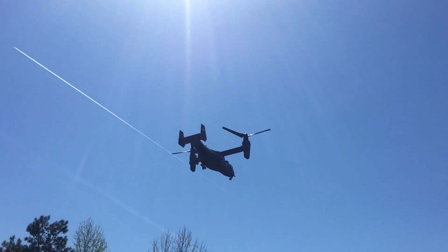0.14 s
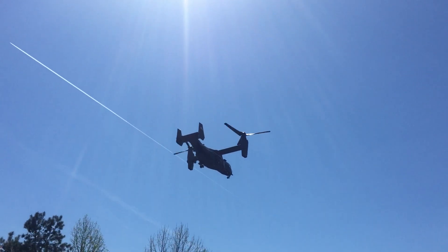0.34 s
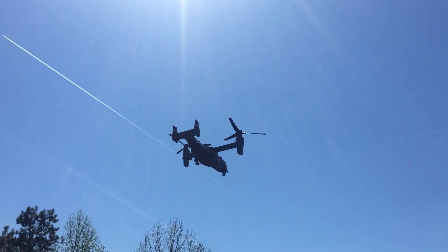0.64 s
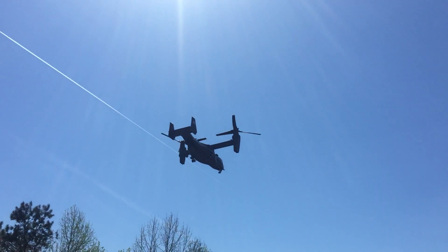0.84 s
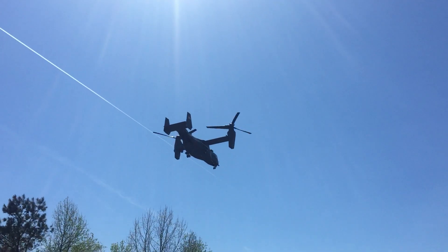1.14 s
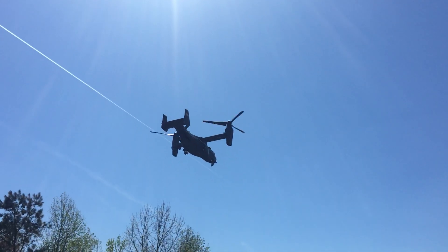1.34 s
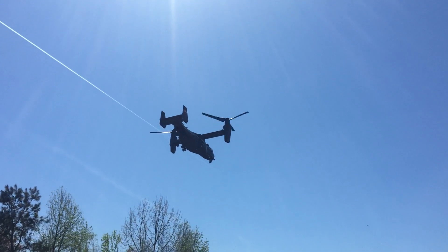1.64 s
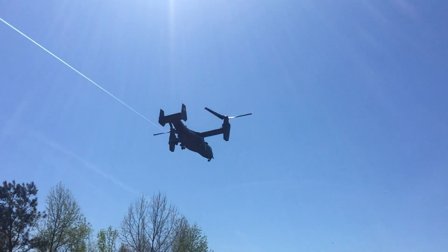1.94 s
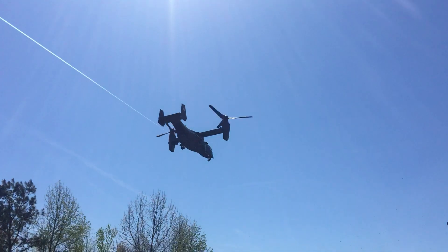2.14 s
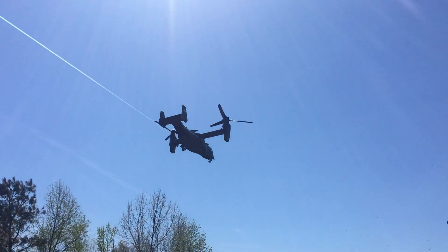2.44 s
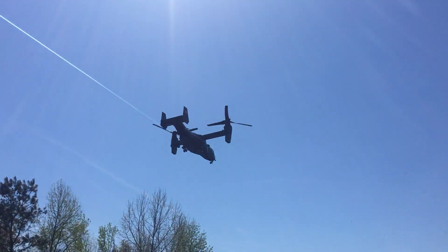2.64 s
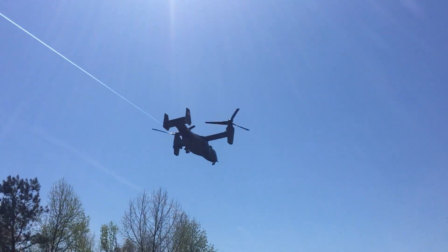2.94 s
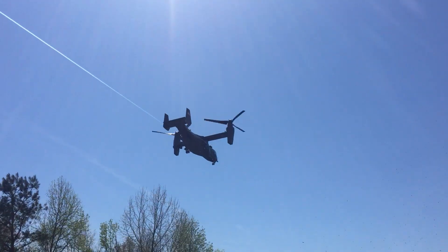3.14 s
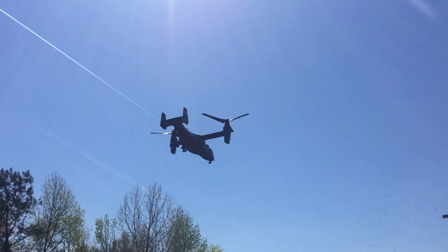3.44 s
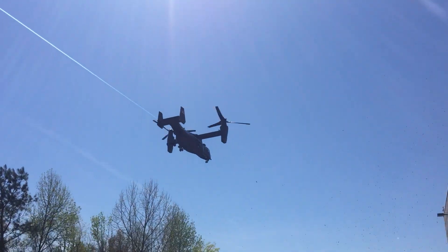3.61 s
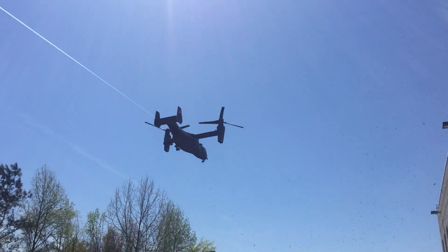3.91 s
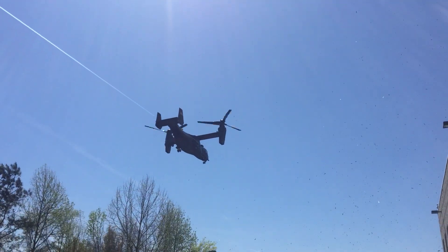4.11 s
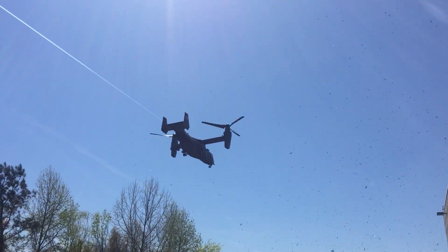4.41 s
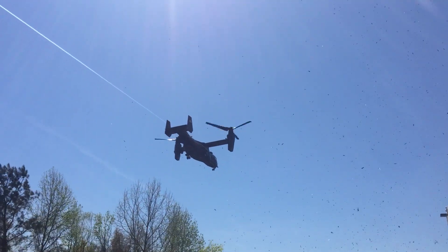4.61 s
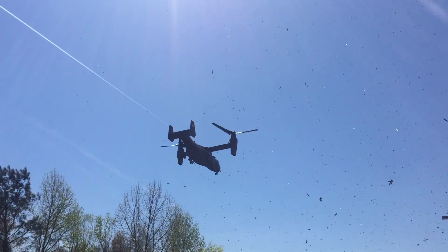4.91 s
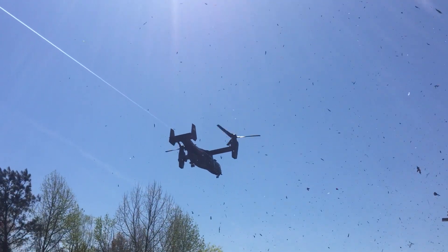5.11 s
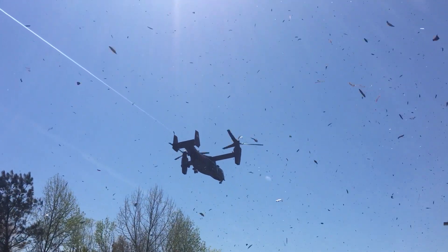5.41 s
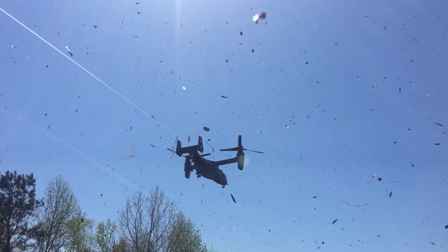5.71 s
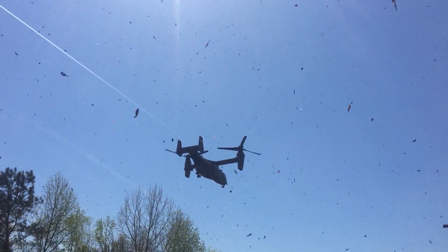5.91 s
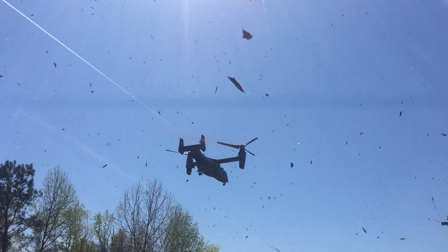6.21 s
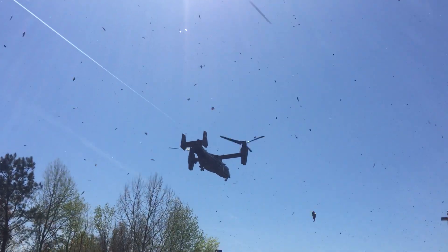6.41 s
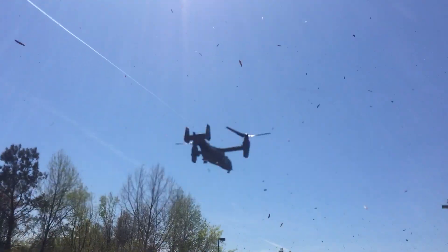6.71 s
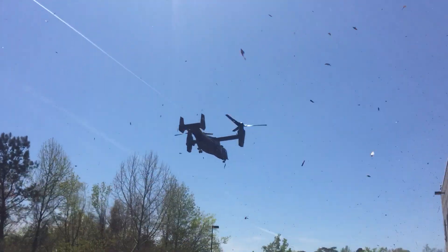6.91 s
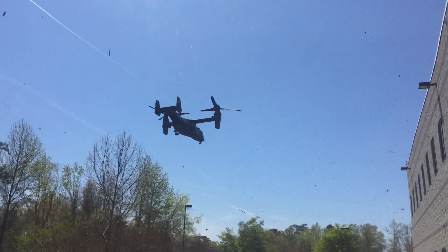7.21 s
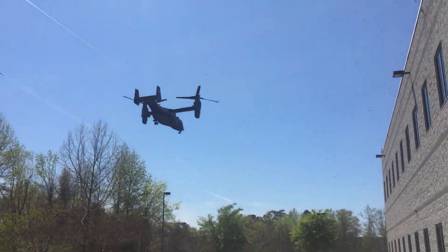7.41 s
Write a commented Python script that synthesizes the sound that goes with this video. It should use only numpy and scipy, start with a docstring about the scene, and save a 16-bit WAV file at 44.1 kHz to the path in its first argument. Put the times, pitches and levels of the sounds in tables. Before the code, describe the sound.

A tiltrotor aircraft passes low overhead with loud thudding blades and roaring engines, then its downwash blasts wind and grit against the microphone.

```python
"""A tiltrotor aircraft passes low overhead on its way down to land, heard from beside a building.
On approach, each blade of its two rotors slaps (a thump plus tip-vortex cracks), heard directly and
off the ground and walls, over a pulsing swish and the engines' roar. Near 4.2 s it is overhead and its
hum sits higher. From about 5 s the downwash buffets the microphone; from 6.5 s it throws grit at it.
The loudest peaks overload and are ducked by a limiter."""
import sys
import numpy as np
from scipy import signal
from scipy.fft import rfft, irfft, next_fast_len
from scipy.io import wavfile
from scipy.ndimage import uniform_filter1d, minimum_filter1d, map_coordinates

SR = 44100
rng = np.random.default_rng(int(sys.argv[2]) if len(sys.argv) > 2 else 0)


def int16_out(signal):
    """Quantize to a 16-bit WAV file."""
    q = np.round(np.clip(np.atleast_2d(signal).T, -1, 1) * 32767)
    wavfile.write(sys.argv[1], SR, q.astype(np.int16))


N = 332955
TIME = np.arange(N) / SR
BLADE_HZ, OVERHEAD_S = 20.53, 4.19

# aircraft nears, then recedes: (time [s], extra travel time [ms])
PATH_DELAY = [(0, 2.8), (.45, .5), (.85, .2), (1.45, -1.5), (2.2, -.8), (3.2, .4), (3.8, .7), (4.55, .25),
              (5.55, 5.1), (6.65, 7.6), (7.55, 11.05)]
# ground echo, closing in on descent: (time [s], lag [ms], echo level of near thump [dB])
GROUND_ECHO = [(0, 4.28, 0), (1.4, 4.15, 0), (3.1, 4.06, -3), (3.8, 3.74, -2.8), (4.8, 3.73, -10),
               (6, 3.2, -1.4), (7.55, 3.46, -2.1)]
# each rotor beams its thump at the listener, then past: (time [s], near level [dB], far level [dB])
THUMP_LEVELS = [(0, -0.5, -5.5), (1.4, 0.9, -9), (3.1, -1, -30), (3.55, -0.5, -6), (3.9, -10, -6.5),
                (4.6, -4.5, -6.5), (5.05, -12, -9), (5.35, -8.5, -11), (5.7, -8.5, -10), (6.3, -5, -15.5),
                (7.55, -6, -17.5)]
# blades biting into their own wake: (time [s], crack level [dB], swish level [dB])
WAKE_BITE = [(0, -11, -23.5), (.65, -7.5, -19), (1.5, -14.5, -22), (2.2, -12, -18.5), (2.55, -20.5, -20.5),
             (3.25, -26, -21), (3.9, -16, -28.5), (4.7, -23, -29.5), (5.05, -20, -25.5), (6.15, -9.5, -25),
             (6.6, -22, -16.5), (7.55, -47, -24)]
# blade-to-blade likeness of the noise: (frequency [Hz], swish [0-1], roar [0-1])
WAKE_LIKENESS = [(130, .65, .5), (350, .75, .5), (700, .58, .25), (1400, .42, .08), (3000, .12, .02),
                 (6000, .02, .01)]


def from_db(db):
    """Decibels to gain."""
    return 10 ** (np.asarray(db) / 20)


def unit_rms(x):
    """Scale to rms 1."""
    return x / np.sqrt(np.mean(x ** 2) + 1e-20)


def curves(rows, at):
    """Remaining columns, interpolated along the first."""
    axis, *columns = np.transpose(rows)
    return [np.interp(at, axis, column) for column in columns]


def butter(x, hz, kind, order=2):
    """Causal Butterworth filter."""
    sos = signal.butter(order, np.clip(hz, 10, .45 * SR), kind, fs=SR, output="sos")
    return signal.sosfilt(sos, x + 1e-18)


def two_pole(x, hz, q, kind):
    """Resonant high- or low-pass."""
    w = 2 * np.pi * hz
    numerator = [1, 0, 0] if kind == "high" else [w * w]
    return signal.lfilter(*signal.bilinear(numerator, [1, w / q, w * w], SR), x + 1e-18)


def noise(spectrum, likeness=((100, 0), (1000, 0))):
    """Coloured noise, rms 1; likeness makes it partly repeat at the blade rate."""
    hz, db = np.transpose(spectrum)
    size = next_fast_len(N, True)
    bins_hz = np.maximum(np.arange(size // 2 + 1) * SR / size, 1)
    gain = from_db(np.interp(np.log(bins_hz), np.log(hz), db)) * np.minimum(bins_hz / hz[0], 1) ** 2
    feedback = curves(likeness, bins_hz)[0]
    comb = np.sqrt(1 - feedback ** 2) / (1 - feedback * np.exp(-2j * np.pi * bins_hz / BLADE_HZ))
    return unit_rms(irfft(rfft(rng.standard_normal(size)) * gain * comb, size)[:N])


def drift(rate_hz):
    """Random curve, rate_hz points a second, rms 1."""
    steps = rng.standard_normal(N // 10)
    return unit_rms(np.interp(TIME * rate_hz, np.arange(len(steps)), steps))


def impulses(at_s, gains):
    """Single-sample impulse train."""
    index = np.round(at_s * SR).astype(int)
    inside = (index >= 0) & (index < N)
    return np.bincount(index[inside], gains[inside], N)


def shaped(train, shape):
    """Filter by shape, its impulse response scaled to peak 1."""
    return shape(train) / np.abs(shape(signal.unit_impulse(2048))).max()


def noisy_tails(train, decay_s):
    """A decaying noise burst per impulse."""
    envelope = signal.lfilter([1], [1, -np.exp(-1 / (decay_s * SR))], train + 1e-18)
    return envelope * rng.standard_normal(N)


def blade_times(far=False, first_s=.037):
    """Blade arrivals [s]: steady rotor, changing path."""
    # far rotor behind the near one: (time [s], lag [ms])
    far_lag = [(0, 9.1), (1.4, 9.2), (3.1, 8.3), (3.6, 7.2), (4.3, 7.8), (4.9, 8.0), (5.4, 7.85),
               (7.55, 7.9)]
    sent_s = first_s + np.arange(-1, TIME[-1] * BLADE_HZ + 1) / BLADE_HZ
    delay_ms = curves(PATH_DELAY, sent_s)[0] + far * curves(far_lag, sent_s)[0]
    return sent_s + delay_ms / 1000


def blade_count(at_s):
    """Continuous count of blade passes."""
    return np.interp(TIME, at_s, np.arange(len(at_s)))


def wall_echoes(x):
    """Dull echoes off the building and trees swell, slide and fade as the aircraft passes."""
    # (lag [ms], slide [ms/s], peak level [dB], peak time [s], half-width [s])
    reflectors = [(13.2, -.04, -7.6, .7, 3.7), (16.2, -.08, -10, 0, 2.9), (19.1, .21, -10.2, 0, 1.7),
                  (29.45, .44, -17.4, .7, .9), (14.25, .03, -6.2, 2.77, 1.25),
                  (49.8, -.13, -6.5, 6.8, 1.15), (10.74, .59, -11.4, 7.3, 2)]
    dull = butter(x, 1300, "low", order=1)
    out = 0
    for lag_ms, slide_ms_per_s, db, peak_s, width_s in reflectors:
        since_s = TIME - peak_s
        lag_s = (lag_ms + slide_ms_per_s * since_s) / 1000
        echo = np.interp(TIME - lag_s, TIME, dull, left=0)
        out = out + from_db(db) / (1 + (since_s / width_s) ** 2) * echo
    return out


def ground_comb(x, echo_db=-14, lead_ms=.11):
    """Noise plus its dull ground echo; the comb slides up as the aircraft sinks."""
    lag_s = (curves(GROUND_ECHO, TIME)[0] - lead_ms) / 1000
    dull = butter(x, 900, "low", order=1)
    return x + from_db(echo_db) * np.interp(TIME - lag_s, TIME, dull, left=0)


def ground_pairs(at_s, level_db, ground_db, lead_ms=0):
    """Impulses, each followed by its ground echo."""
    lag_s = (curves(GROUND_ECHO, at_s)[0] - lead_ms) / 1000
    return impulses(at_s, from_db(level_db)) + impulses(at_s + lag_s, from_db(level_db + ground_db))


def multipath(x):
    """Added to x: narrow bands swell, dip and glide as the paths drift in and out of step."""
    # (time [s], half-width [s], centre [Hz], glide [Hz/s], bandwidth [Hz], gain [dB])
    swells = [(.152, .087, 670, 5, 140, 6), (.83, 0.079, 570, 1, 160, -2.5), (1.1, 1.5, 345, 17.5, 52, -8),
              (1.2, 0.21, 540, 44, 130, 3), (1.7, 1.5, 750, 23, 180, -6), (2.35, .7, 560, 29.5, 120, 3),
              (2.2, .5, 82, 2.5, 24, 7), (2.6, 1.1, 140, 25, 45, -8.5), (5.05, 0.14, 280, 0, 94, -4.5),
              (5.5, .5, 235, 0, 120, -0.5), (4.8, 0.41, 690, 1, 150, 2.5), (3.55, 0.43, 980, -4, 100, 2.5),
              (3.6, 0.51, 530, -5.5, 110, -7), (4.75, 0.18, 295, -2, 45, 1.5),
              (5.33, 0.078, 360, -110, 45, 7), (5.55, 0.25, 314, -130, 45, 4), (5.48, .08, 480, 9, 110, -5),
              (6.0, 0.67, 680, 3, 60, 2.5), (6.25, .18, 840, 1, 111, 5)]
    out = np.zeros(N)
    for at_s, width_s, hz, glide_hz_per_s, width_hz, db in swells:
        span = np.abs(TIME - at_s) < 3 * width_s
        since_s = TIME[span] - at_s
        carrier = np.exp(2j * np.pi * (hz + glide_hz_per_s * since_s / 2) * since_s)
        band = 2 * np.real(carrier * butter(x[span] / carrier, width_hz / 2, "low", order=1))
        out[span] += (from_db(db) - 1) * np.exp(-(since_s / width_s) ** 2) * band
    return out


def casing(x):
    """The microphone casing colours sharp sounds."""
    # (centre [Hz], bandwidth [Hz], gain [dB])
    bands = [(4900, 820, -4), (7500, 1500, -4), (9100, 760, 1), (11000, 3800, -7.5), (13200, 1000, -0.5),
             (15000, 800, 2.5)]
    return x + sum((from_db(db) - 1) * butter(x, [hz - width_hz / 2, hz + width_hz / 2], "band", order=1)
                   for hz, width_hz, db in bands)


def downwash(lumps_db=3.5, band_ratio=1.5):
    """Lumpy wind on the microphone: first a breeze, then hard puffs."""
    # (time [s], level [dB])
    wind_levels = [(4.6, -67), (4.95, -29), (5.3, -39), (5.85, -29), (6.45, -49), (6.62, -24), (6.96, -29),
                   (7.15, -18), (7.35, -24), (7.55, -45)]
    # (frequency [Hz], relative density [dB])
    buffet_spectrum = [(15, -27.5), (30, -21), (55, 0.5), (90, -2.5), (150, -11), (400, -26), (1500, -67.5)]
    # (time [s], peak [dB], pitch [Hz])
    puffs = [(6.58, -11, 91), (6.672, -2, 164), (6.718, -11, 87.5), (6.863, -3, 66), (7.074, -9.5, 92),
             (7.145, -20, 56), (7.2, -4.5, 110), (7.214, -16, 52.6), (7.365, -12, 68), (7.451, -16, 62)]
    buffet = unit_rms(noise(buffet_spectrum) * from_db(lumps_db * drift(22)))
    out = from_db(curves(wind_levels, TIME)[0]) * buffet
    for at_s, db, hz in puffs:
        push = impulses(np.array([at_s]), from_db([db]))
        out += shaped(push, lambda x: butter(x, [hz / band_ratio, hz * band_ratio], "band"))
    return out


def grit(attack_s=.013, decay_s=.0078, grains_per_s=900, coarse_db=-14, coarse_hz=2200):
    """Flurries of fine sand hit the microphone; coarser grains tick singly."""
    # (start [s], length [s], level [dB])
    flurries = [(6.51, 0.14, -29.5), (6.674, 0.093, -19.5), (6.815, 0.19, -18), (7.077, 0.033, -20)]
    # (frequency [Hz], relative density [dB])
    sand_spectrum = [(250, 26), (400, 24.5), (800, 28), (2000, 17), (3200, 7), (5000, -9), (9000, -24),
                     (12000, -38), (15500, -28)]
    envelope = 0
    for start_s, length_s, db in flurries:
        rise = np.clip((TIME - start_s) / attack_s, 0, 1)
        fall = np.exp(-np.maximum(TIME - start_s - length_s, 0) / decay_s)
        envelope = envelope + from_db(db) * rise * fall
    fine = unit_rms(noise(sand_spectrum) * from_db(3.5 * drift(2500) + .5 * drift(120)))
    hits = rng.random(N) < grains_per_s / SR
    grains = hits * from_db(4.5 * rng.standard_normal(N)) * rng.choice([-1, 1], N)
    coarse = unit_rms(butter(butter(grains, coarse_hz, "low"), coarse_hz / 2, "high", order=1))
    return envelope * (fine + from_db(coarse_db) * coarse)


def debris():
    """Bits of leaf and twig tick on the casing."""
    # (time [s], peak [dB], upper edge [Hz], decay [s])
    impacts = [(4.474, -26, 11000, 0.0014), (5.138, -6.5, 695, 0.0065), (5.204, -14.5, 790, 0.0027),
               (6.057, -31, 13000, 0.00096), (6.689, -31, 2200, .003), (6.711, -10, 2300, 0.0029),
               (6.717, -3.5, 2680, 0.0013), (6.725, -12, 2700, 0.0018), (6.733, -14, 2800, 0.00085),
               (6.763, -15, 2000, 0.0046), (6.869, -22, 2800, .001), (6.881, -24, 6500, 0.005),
               (6.89, -11, 2400, .002), (6.915, -22, 3000, .001), (6.937, -20, 1500, 0.0086),
               (7.097, -11, 2390, 0.0023), (7.102, -11, 2390, 0.0029), (7.11, -14, 2200, 0.002),
               (7.265, -6, 10500, 0.0013), (7.273, -9.5, 14000, 0.0022), (7.362, -8.5, 3140, .0035),
               (7.385, -16, 1900, .002), (7.47, -14.5, 1870, 0.001), (7.526, -22, 900, .002)]
    out, age_s = np.zeros(N + SR), TIME[:SR // 20]
    for at_s, db, hz, decay_s in impacts:
        burst = rng.standard_normal(len(age_s)) * np.exp(-age_s / decay_s)
        tick = butter(butter(burst, hz, "low"), hz / 2, "high", order=1)
        start = round(at_s * SR)
        out[start:start + len(tick)] += from_db(db) * tick / np.abs(tick).max()
    return out[:N]


def wake_noise(spectrum, likeness):
    """Each blade cuts much the same wake; its noise travels the changing path."""
    sent_s = TIME - curves(PATH_DELAY, TIME)[0] / 1000
    return map_coordinates(noise(spectrum, likeness), [sent_s * SR], order=3, mode="mirror")


def engine_roar(gain_db=-21.5, flutter_db=1.0, bass_hz=420):
    """Engines and wake; the bass rises as the aircraft arrives overhead."""
    # (frequency [Hz], relative density [dB])
    roar_spectrum = [(40, -10.5), (100, -5.5), (155, 4), (290, 7), (380, 4), (480, -4), (620, -1.5),
                     (730, -9), (880, -6.5), (1200, -8), (2000, -12), (3200, -22), (4300, -27.5),
                     (5000, -34.5), (6300, -38.5), (7600, -47), (9300, -50), (10500, -61.5)]
    # (time [s], bass gain [dB])
    bass_gains = [(0, -5), (2.4, -1.5), (3.3, 3), (4.3, 0), (6.2, 0.5), (7.55, -0.5)]
    likeness = [(hz, share) for hz, _, share in WAKE_LIKENESS]
    roar = wake_noise(roar_spectrum, likeness) * from_db(flutter_db * drift(30))
    bass = butter(roar, bass_hz, "low", order=1)
    return from_db(gain_db) * (roar + (from_db(curves(bass_gains, TIME)[0]) - 1) * bass)


def blade_swish(rise_ms=3.9, fall_ms=6.0, lag_ms=1.2, flutter_db=2.0, overhead_width_s=2.0):
    """Noise swells as each blade advances on the listener, for longer when heard from below."""
    # (frequency [Hz], relative density [dB])
    swish_spectrum = [(200, -2.5), (400, 1), (560, 4), (720, 1.5), (900, 0), (1150, -1), (1600, -8),
                      (2350, -15), (3800, -24.5), (5000, -34), (6300, -37.5), (8000, -59.5), (11000, -57),
                      (15500, -56)]
    count = blade_count(blade_times() + lag_ms / 1000)
    from_peak_ms = 1000 * (count - np.round(count)) / BLADE_HZ
    stretch = 1 + .35 * np.exp(-((TIME - OVERHEAD_S) / overhead_width_s) ** 2)
    width_ms = stretch * np.where(from_peak_ms < 0, rise_ms, fall_ms)
    swell = 1 / (1 + (from_peak_ms / width_ms) ** 2)
    likeness = [(hz, share) for hz, share, _ in WAKE_LIKENESS]
    swish = unit_rms(wake_noise(swish_spectrum, likeness) * swell * from_db(flutter_db * drift(150)))
    return from_db(curves(WAKE_BITE, TIME)[1]) * swish


def lift_hum(waver_db=2.5, lead_ms=3.05, overhead_width_s=.34, thump_share=.44):
    """Blade lift hums on low harmonics of the blade rate; the upper ones gain overhead."""
    # (harmonic number, base level [dB], change overhead [dB])
    harmonics = [(2, -43.5, -8), (3, -37.5, -5), (4, -32.5, -4), (5, -52, -10.5), (6, -40.5, -4.5),
                 (7, -41.5, 15), (8, -29.5, 6.5)]
    overhead = np.exp(-((TIME - OVERHEAD_S) / overhead_width_s) ** 2)
    out = 0
    for far, thump_db in enumerate(curves(THUMP_LEVELS, TIME)):
        phase = 2 * np.pi * blade_count(blade_times(far) - lead_ms / 1000)
        for harmonic, base_db, change_db in harmonics:
            level_db = base_db + change_db * overhead + waver_db * drift(4) + thump_share * thump_db
            out = out + from_db(level_db) * np.sin(harmonic * phase)
    return out


def shocks(lag_ms=.6, ground_db=-2.5, rasp_db=-12, fizz_db=-40):
    """Blades hitting a vortex squarely steepen into small, ragged shocks; the hardest ones overload, and a
    brief high fizz trails them."""
    # (start [s], length [s], level [dB])
    runs = [(.07, 1.55, -17.5), (.22, .09, -12), (.55, .19, -6), (.89, .1, -8.5), (1.04, .19, -12),
            (1.29, .05, -18), (1.67, .1, -4.5), (2.01, .29, -17), (2.07, .04, -21), (2.21, .04, -20),
            (2.85, .04, -12), (3.19, .04, -13.5), (5.04, .04, -19), (5.08, .05, -7), (5.29, .04, -16),
            (5.53, .04, -27), (5.62, .05, -7), (5.82, .5, -23), (6.02, .04, -13), (6.36, .09, -3),
            (6.5, .14, 0)]

    def snap(x):
        band = butter(butter(x, 470, "high", order=1), 2200, "low")
        return butter(band, 9000, "low", order=1)

    at_s = blade_times() + lag_ms / 1000
    scatter_db = rng.standard_normal(len(at_s))
    train = 0
    for start_s, length_s, db in runs:
        hit = (at_s >= start_s) & (at_s < start_s + length_s)
        train = train + ground_pairs(at_s[hit], db + scatter_db[hit], ground_db)
    ragged = train + from_db(rasp_db) * noisy_tails(train, decay_s=.0005)
    fizz = from_db(fizz_db) * noisy_tails(train ** 2, decay_s=.007)
    return shaped(ragged, snap) + fizz


def cracks(at_s, level_db, ground_db, spread_db, scatter_ms, drift_hz=.8):
    """Each blade cuts three drifting tip vortices; older ones are weaker and stray further."""
    def pulse(x):
        band = butter(butter(x, 1200, "high", order=1), 1400, "low")
        return butter(band, 3700, "low")

    train = 0
    for age in range(3):
        offset_ms = .16 + scatter_ms * (age + .11) * np.interp(at_s, TIME, drift(drift_hz))
        strength = .7 * np.interp(at_s, TIME, drift(7)) + .7 * rng.standard_normal(len(at_s))
        crack_db = level_db - 2.5 * age + spread_db * strength
        train = train + ground_pairs(at_s + offset_ms / 1000, crack_db, ground_db)
    return shaped(train, pulse)


def thumps(at_s, level_db, ground_db, echo_lead_ms, low_cut_hz, low_cut_q, graze_db,
           graze_ms=2.17, spread_db=.5, jitter_ms=.12):
    """One rounded, uneven pressure pulse per blade; a hard one grazes another vortex just before."""
    def pulse(x):
        rounded = two_pole(butter(x, 190, "low", order=1), hz=444, q=1.0, kind="low")
        swinging = two_pole(rounded, hz=237, q=1.61, kind="high")
        return two_pole(swinging, low_cut_hz, low_cut_q, kind="high")

    wander, strength = rng.standard_normal((2, len(at_s)))
    at_s = at_s + jitter_ms * wander / 1000
    main = ground_pairs(at_s, level_db + spread_db * strength, ground_db, echo_lead_ms)
    graze = ground_pairs(at_s - graze_ms / 1000, 2 * level_db + graze_db, ground_db, echo_lead_ms)
    return shaped(main + graze, pulse)


def rotor_slaps(far_crack_db=-10):
    """Both rotors: a thump and its cracks per blade."""
    # uneven air weights a few thumps in a row: (time [s], half-width [s], gain [dB])
    surges = [(.7, 0.092, -1), (1.43, 0.11, 0), (1.75, 0.044, 1), (2.562, 0.039, -6), (3.151, 0.038, -8),
              (3.52, .06, 0), (3.86, 0.032, -2), (4.0, .04, 2.5), (5.03, 0.086, -0.5), (6.38, 0.068, 2),
              (6.82, .035, 4)]
    near_s, far_s = blade_times(), blade_times(far=True)
    surge_db = sum(db * np.exp(-((near_s - at_s) / width_s) ** 2) for at_s, width_s, db in surges)
    near_db, far_db = curves(THUMP_LEVELS, near_s) + surge_db
    near_ground_db = curves(GROUND_ECHO, near_s)[1]
    bite_db = curves(WAKE_BITE, near_s)[0]
    return (thumps(near_s, near_db, near_ground_db, echo_lead_ms=0,
                   low_cut_hz=88, low_cut_q=1.03, graze_db=-11)
            + thumps(far_s, far_db, ground_db=-6.5, echo_lead_ms=.78,
                     low_cut_hz=196, low_cut_q=.49, graze_db=-22)
            + cracks(near_s, bite_db, ground_db=-11.5, spread_db=4.5, scatter_ms=2.0)
            + cracks(far_s, far_db + far_crack_db, ground_db=-11, spread_db=6, scatter_ms=1.7))


def scene():
    """Rotors, echoes, engines and downwash; mono."""
    slaps = rotor_slaps()
    drone = slaps + wall_echoes(slaps) + lift_hum() + ground_comb(blade_swish() + engine_roar())
    return (drone + multipath(drone) + downwash() + casing(shocks() + grit() + debris()))[None]


def record(dry, ceiling=.72, hold_s=.0004, cutoff_hz=16000):
    """Fast peak limiter, then a steep low-pass."""
    hold = int(hold_s * SR)
    target_gain = (1 + (dry / ceiling) ** 8) ** (-1 / 8)
    gain = uniform_filter1d(minimum_filter1d(target_gain, hold), hold)
    return signal.sosfilt(signal.ellip(10, .1, 90, cutoff_hz, fs=SR, output="sos"), dry * gain)


dry = scene()
out = record(dry)
int16_out(out)
```